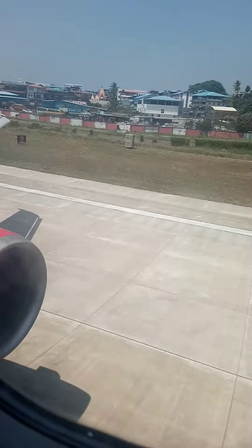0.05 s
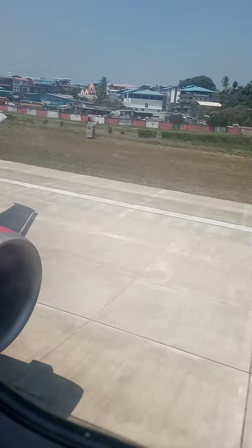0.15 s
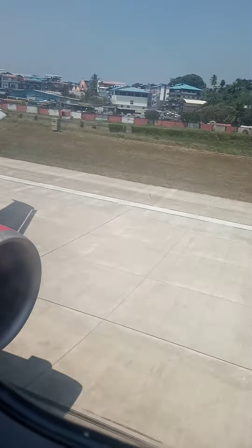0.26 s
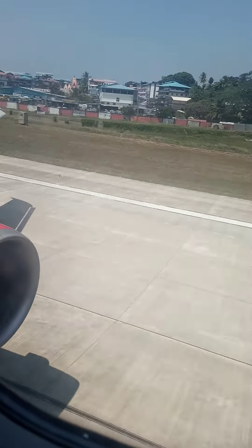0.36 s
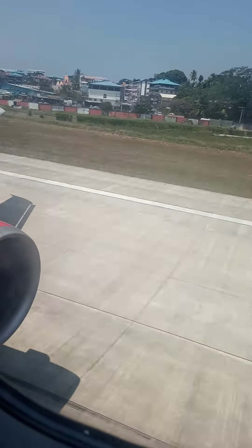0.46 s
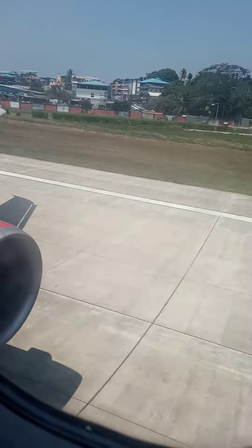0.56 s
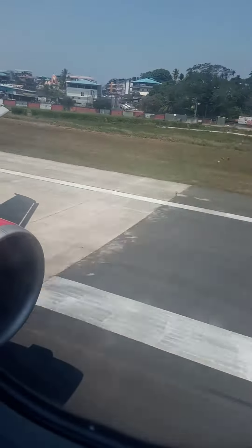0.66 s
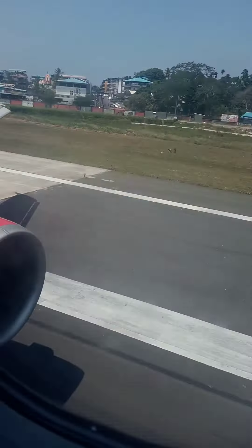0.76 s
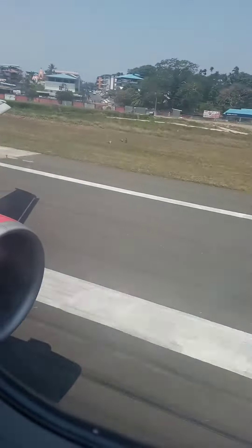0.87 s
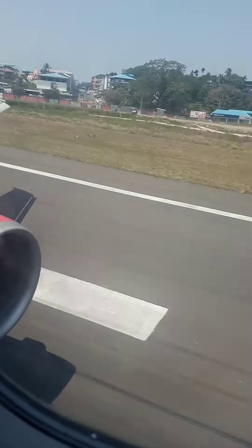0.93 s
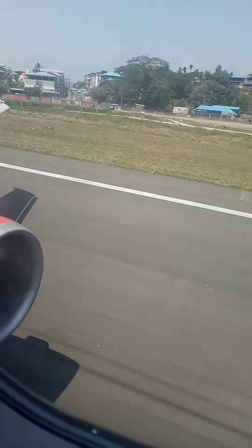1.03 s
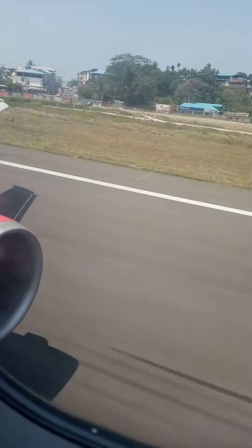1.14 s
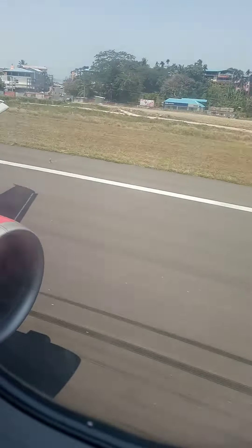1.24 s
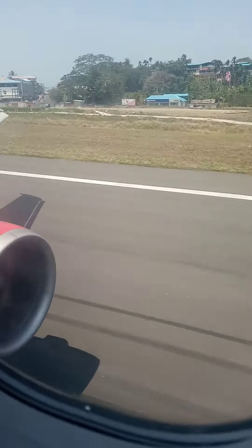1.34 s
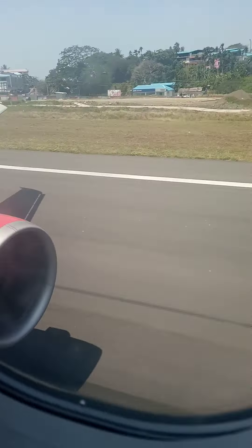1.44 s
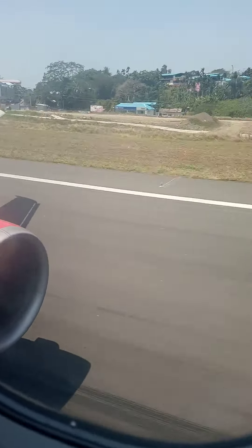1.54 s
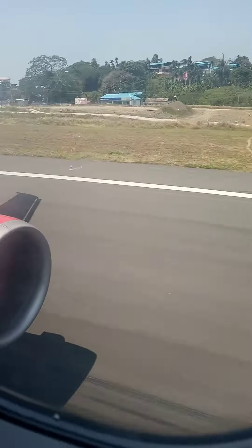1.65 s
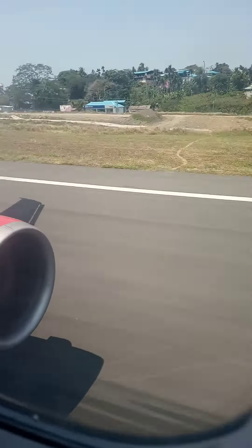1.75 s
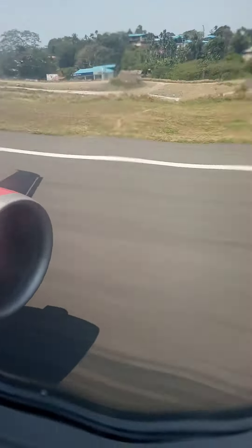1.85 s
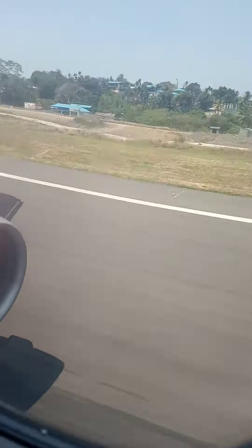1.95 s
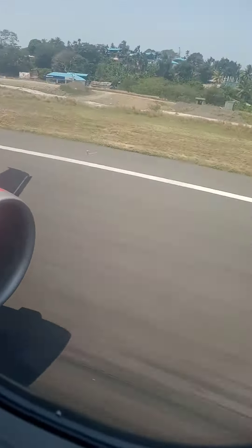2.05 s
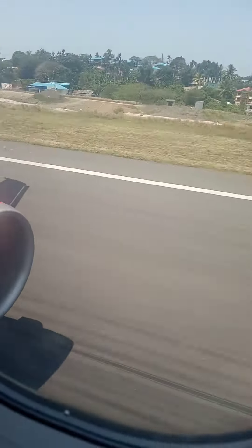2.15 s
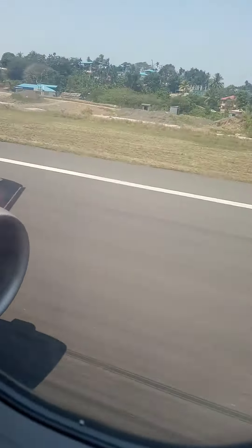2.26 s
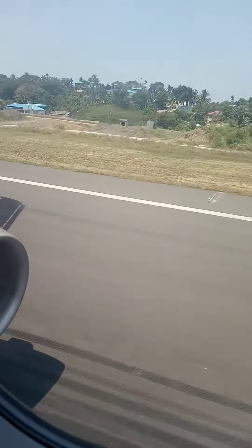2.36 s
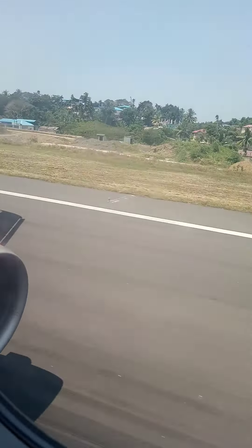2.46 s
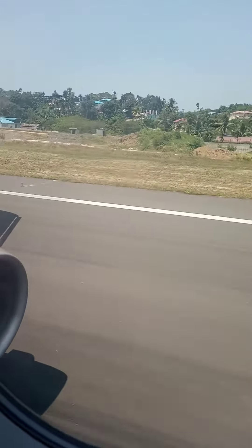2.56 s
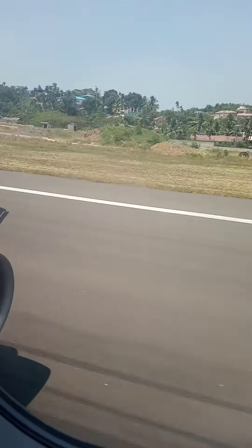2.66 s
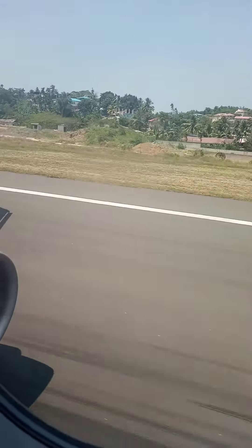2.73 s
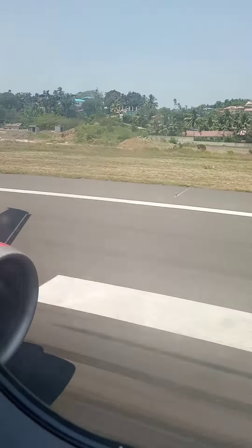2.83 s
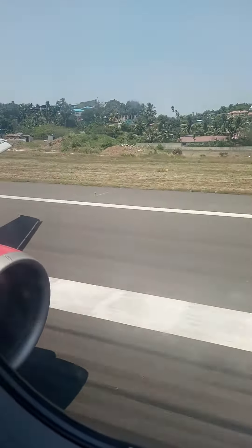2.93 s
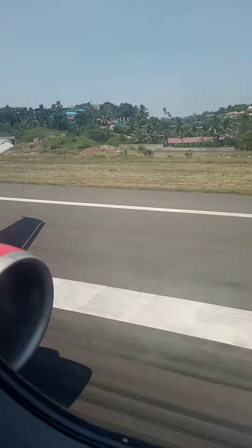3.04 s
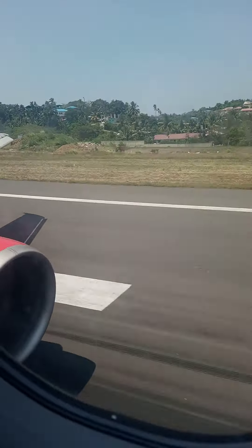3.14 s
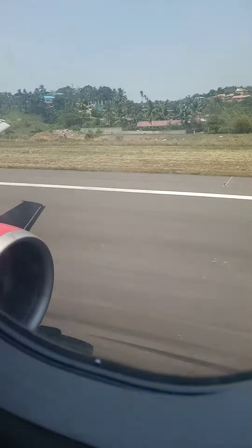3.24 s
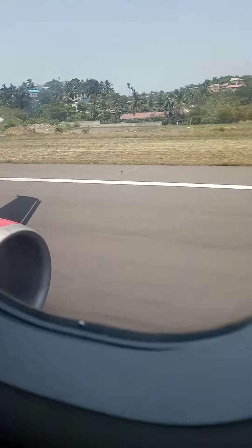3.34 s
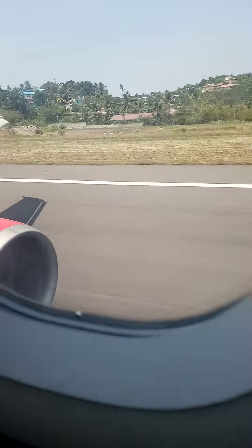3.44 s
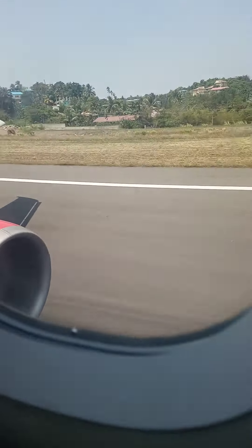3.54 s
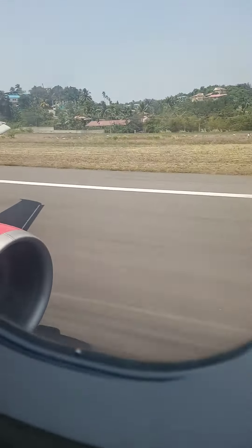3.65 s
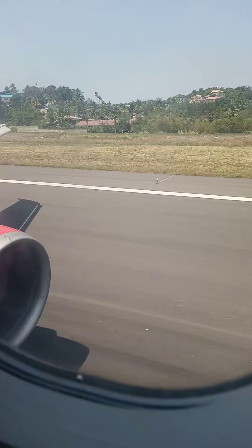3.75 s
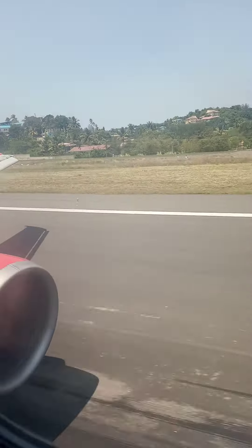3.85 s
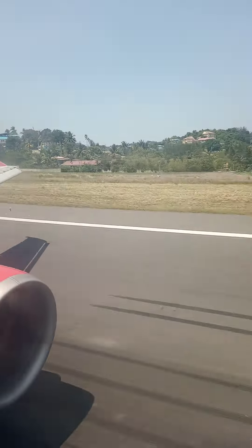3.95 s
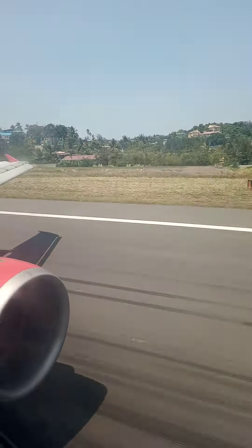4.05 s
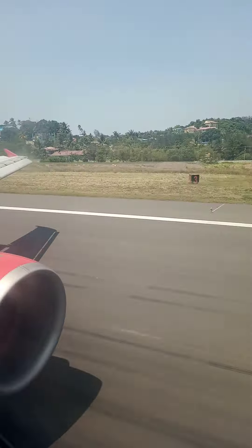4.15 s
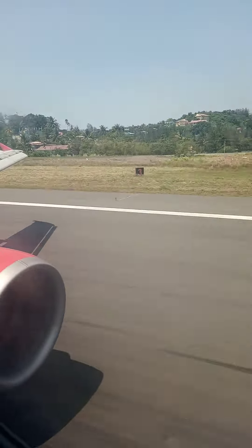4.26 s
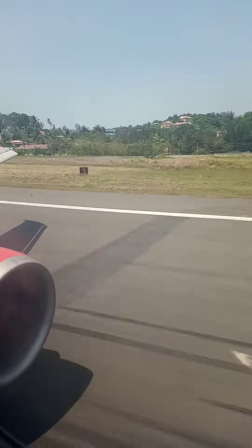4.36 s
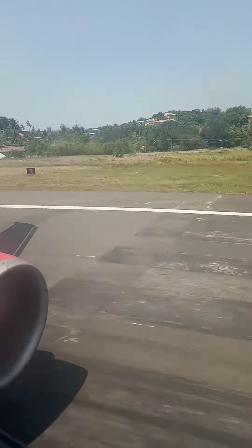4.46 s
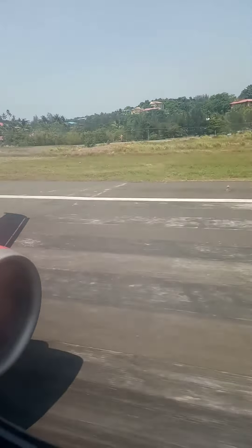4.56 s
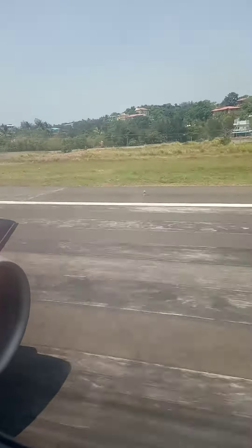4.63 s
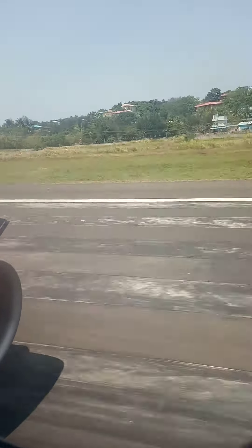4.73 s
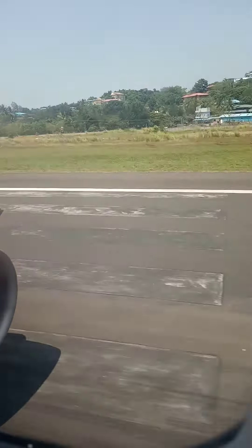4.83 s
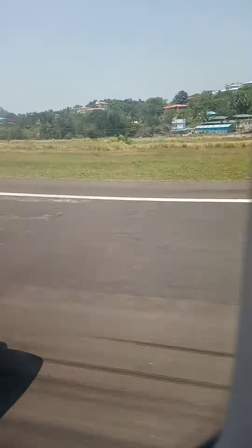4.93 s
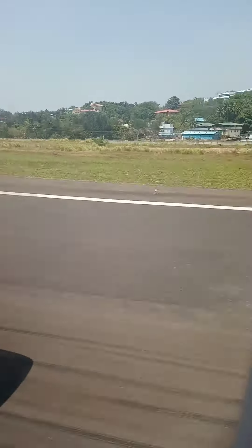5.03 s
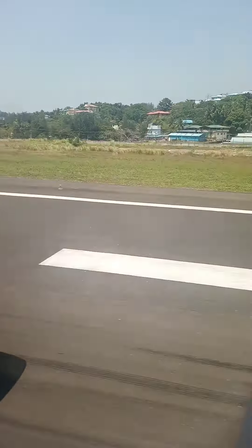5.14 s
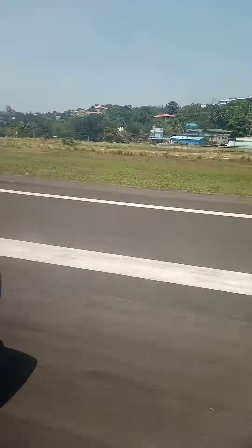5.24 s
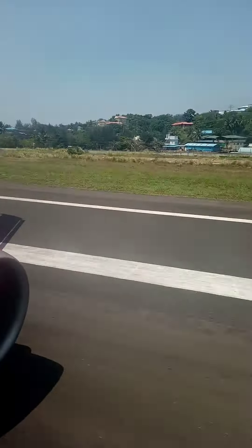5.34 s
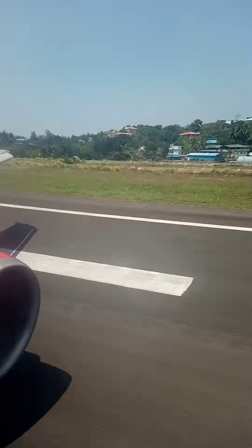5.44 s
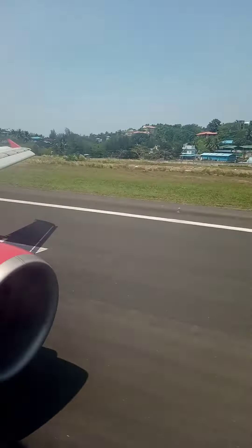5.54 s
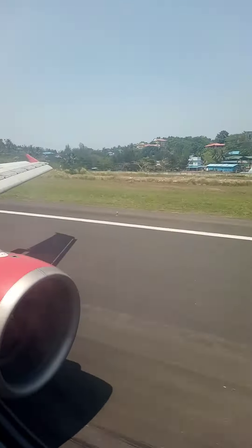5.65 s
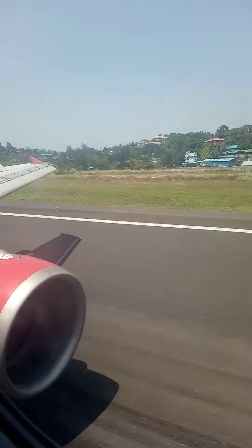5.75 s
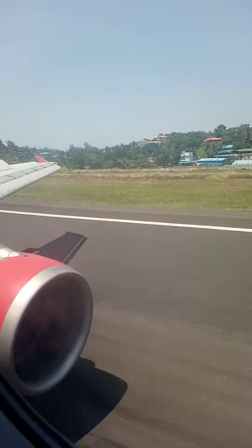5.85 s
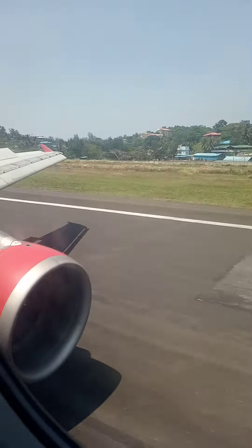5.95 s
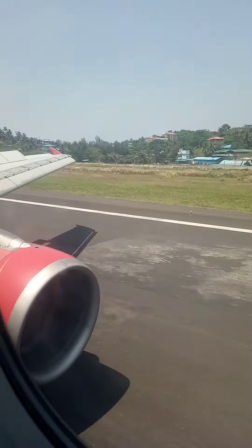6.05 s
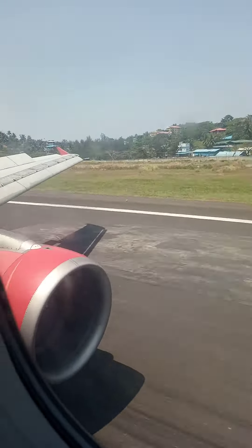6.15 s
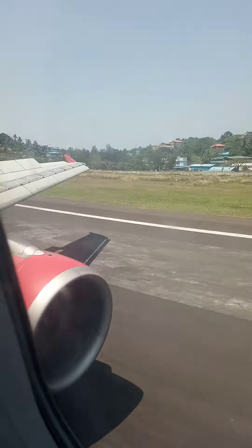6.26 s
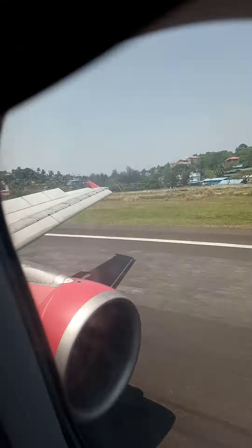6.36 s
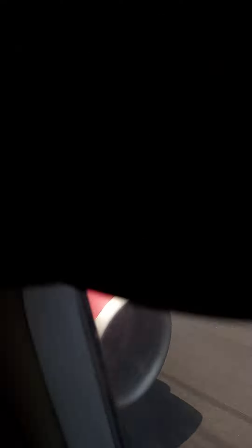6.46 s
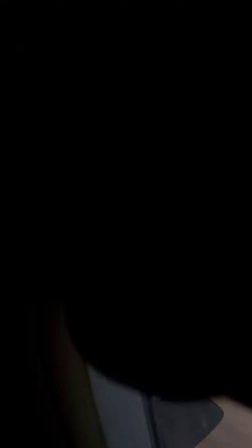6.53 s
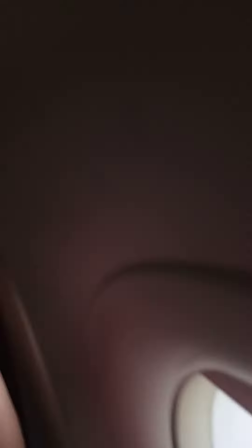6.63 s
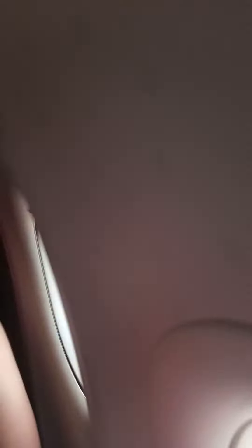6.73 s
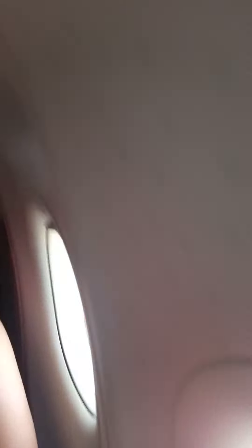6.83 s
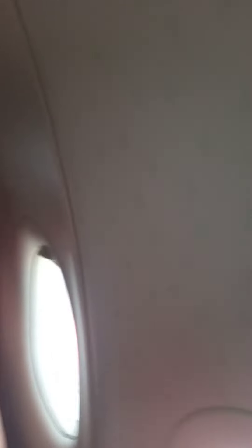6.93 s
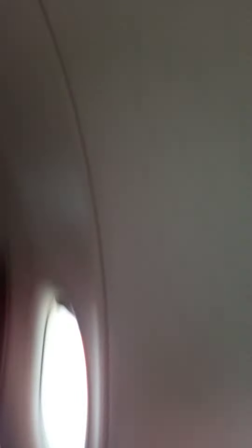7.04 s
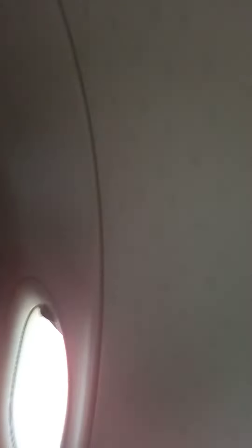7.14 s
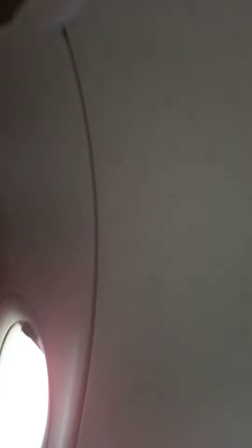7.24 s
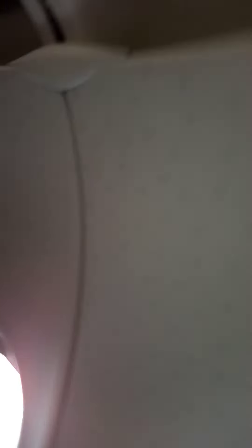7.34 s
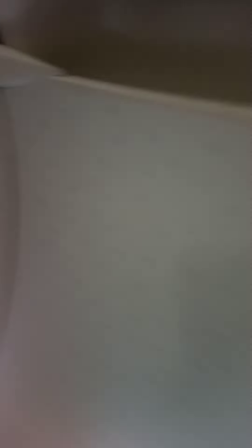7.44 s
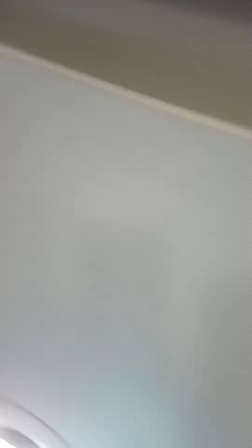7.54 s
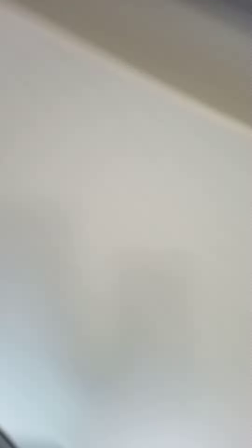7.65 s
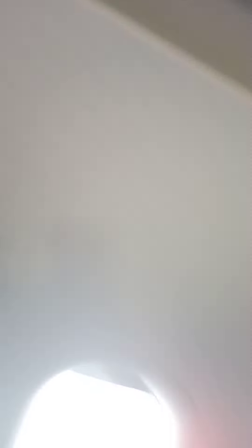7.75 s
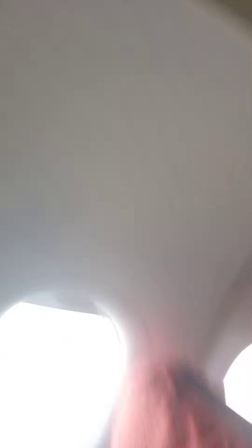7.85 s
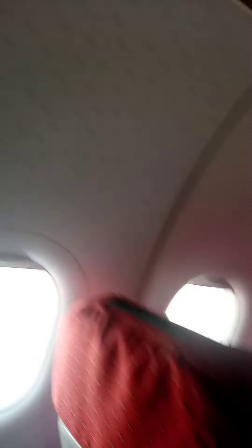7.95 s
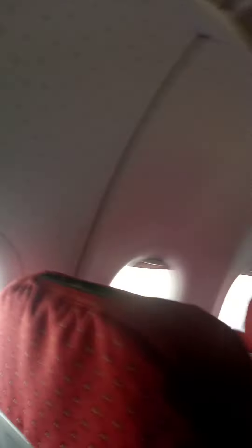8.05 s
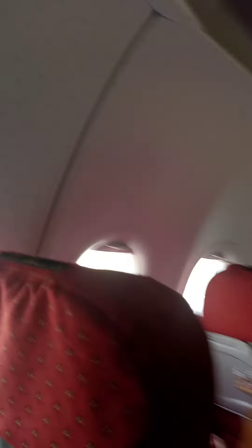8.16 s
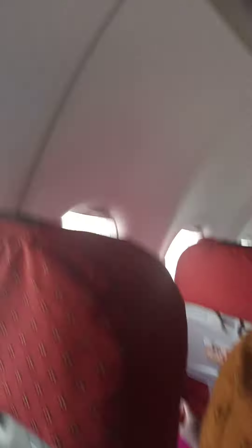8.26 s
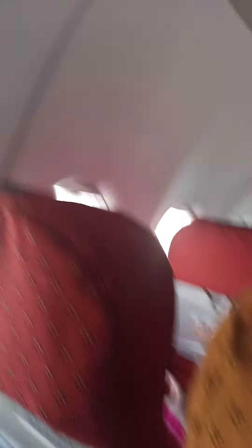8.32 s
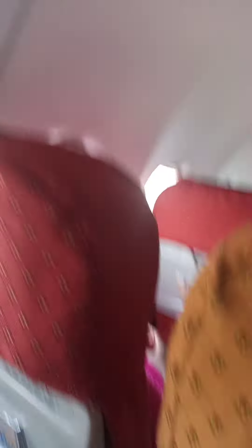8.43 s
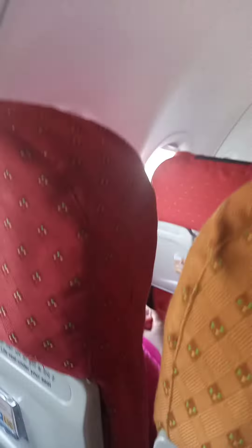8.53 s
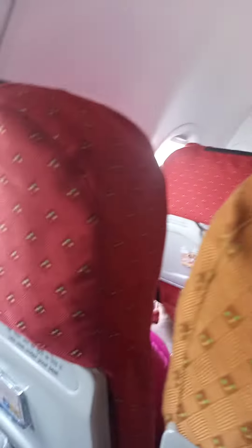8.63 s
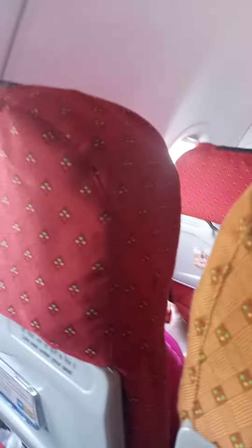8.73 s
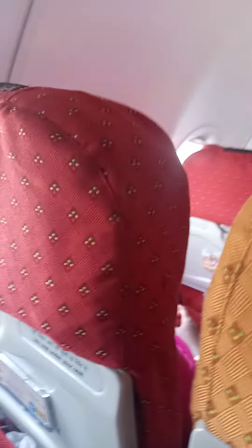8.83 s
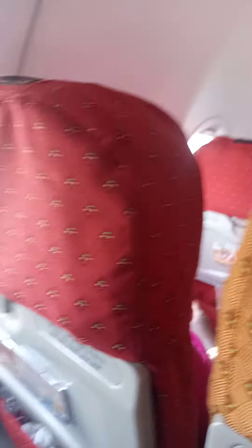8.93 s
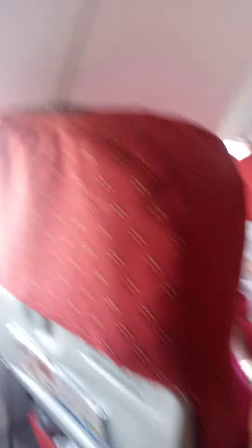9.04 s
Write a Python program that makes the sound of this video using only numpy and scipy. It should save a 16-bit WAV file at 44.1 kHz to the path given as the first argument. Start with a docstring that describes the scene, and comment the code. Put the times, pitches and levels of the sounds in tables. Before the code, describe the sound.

A jet airliner slows on the runway, heard from a phone inside the cabin. At first there is a low rumble, a steady hydraulic pump hum and a soft vent hiss that continues throughout. At about 1.3 seconds the wheel rumble grows heavier and bumps start rattling the trim, with small ticks from loose fittings and a brief plastic scrape at 1.5. The pump rises slightly and stops at 2.3; a short higher hum follows around 3. From 3.5 reverse thrust builds into a deep, resonant roar, strongest from about 6 to 8 seconds, with a faint wavering fan whine from 5.5 to 8.3. Hollow panel knocks come at 3.6, 4.3 and 6.4, then in a quick cluster just after 8. The phone case snaps sharply at 7. The roar eases slightly, with a low booming swell, as the rattling continues to the end at 9.

```python
"""Wheels rumble through the floor and a pump hums: a jet airliner braking, heard at a phone in the cabin.
The pump stops; reverse thrust swells through the hull and rings the cabin, with a faint fan tone.
Bumps rattle the trim, loose fittings tick, a panel knocks, plastic scrapes, the phone case snaps.
Air vents hiss throughout. Near the window, its recess colours the hiss and the rattle."""
import sys
import numpy as np
from scipy import signal
from scipy.fft import rfft, irfft, next_fast_len
from scipy.io import wavfile
from scipy.ndimage import uniform_filter1d, minimum_filter1d

SR = 44100
rng = np.random.default_rng(int(sys.argv[2]) if len(sys.argv) > 2 else 0)


def master(y):
    """Save y as 16-bit WAV."""
    cut = np.clip(np.atleast_2d(y).T, -1, 1)
    pcm = np.round(cut * 32767)  # scale
    wavfile.write(sys.argv[1], SR, pcm.astype(np.int16))


N = 400869

# wheel rumble through the floor: t/s, level/dB
WHEEL_LEVEL = [(0, -29), (.7, -29.5), (1.05, -33), (1.3, -21), (1.9, -19), (2.4, -21), (2.6, -27.5),
               (2.9, -22), (3.1, -20.5), (3.6, -18.5), (4.1, -24), (4.3, -18), (4.9, -18), (5.45, -18),
               (6.05, -17.5), (6.2, -21.5), (6.9, -18.5), (7.8, -22.5), (9.09, -22.5)]


def thrust():
    """The deflected jet beats on the hull; power lifts each band; wheels and jolts shake it too."""
    # band spectra: f/Hz, relative level/dB
    boom_spectrum = [(70, -18), (95, -11.5), (125, -5.5), (145, -9.5), (170, -15), (210, -32.5)]
    growl_spectrum = [(120, -19), (150, -3.5), (190, -2), (225, 0), (260, -27), (320, -42)]
    body_spectrum = [(190, -25), (240, -2.5), (300, -4.5), (400, -8.5), (520, -13), (600, -33.5),
                     (750, -32)]
    rush_spectrum = [(480, -16.5), (600, 1), (750, -2), (1000, -10), (1400, -15.5), (2200, -19),
                     (3000, -27), (6500, -30), (8000, -42), (11500, -50.5), (13000, -71.5)]
    engine_power = [(0, 0), (1.4, 0), (2.8, 0.02), (3.3, 0.11), (4.2, 0.41), (5.0, 0.45), (5.8, 0.74),
                    (6.3, 0.97), (6.9, 1), (7.6, 1), (8.2, 0.97), (9.09, 0.77)]  # t/s, power/0-1
    phone_turn = [(0, 0.17), (6.3, 0.14), (7.1, 0.61), (7.6, 0.69), (8.3, 0.43), (9.09, 1)]  # swing from window into cabin: t/s, turn/0-1
    power, turn = curves(engine_power)[0], curves(phone_turn)[0]
    # dB: idle + rise with power + change with turn
    boom = undb(-29 + 14.5 * power)
    growl = undb(-30 + 12.5 * power + 3.5 * turn)
    body = undb(-29.5 + 13 * power - 3 * turn)
    rush = undb(-45.5 + 13 * power + 3 * turn)
    boom = np.hypot(boom, undb(curves(WHEEL_LEVEL)[0] - 6))
    rush = np.hypot(rush, undb(1.5) * np.sqrt(jolts()[0]))
    return (boom * cabin_noise(boom_spectrum, flicker_db=.83, rate_hz=11)
            + growl * cabin_noise(growl_spectrum, flicker_db=.98, rate_hz=9)
            + body * cabin_noise(body_spectrum, flicker_db=.3, rate_hz=17)
            + rush * cabin_noise(rush_spectrum, flicker_db=.44, rate_hz=15))


def wheels():
    """Tyres on rough tarmac thud through gear and floor."""
    spectrum = [(20, -48), (32, -15.5), (45, 1), (60, 3.5), (80, 3.5), (100, 0), (140, -45.5)]  # f/Hz, relative level/dB
    return undb(curves(WHEEL_LEVEL)[0]) * cabin_noise(spectrum, flicker_db=1.1, rate_hz=12)


def swells():
    """Bands of noise rise out of the roar and sink back."""
    events = [(1.949, 0.32, 1500, 1700, -51), (3.4, 0.29, 1700, 1600, -44), (4.101, 1.1, 271, 6.6, -31),
              (4.801, 1.0, 270.6, 8.5, -27), (5.502, .9, 267.5, 6.4, -26), (6.3, 1.1, 266.8, 9.1, -25.5),
              (6.146, 0.42, 286, 88, -20), (6.751, 0.45, 610, 88, -33), (6.821, 0.5, 340, 91, -18),
              (7.3, 0.58, 524, 50, -29.5), (7.797, 0.13, 1790, 1200, -41), (7.905, 0.13, 740, 76, -35),
              (8.058, .07, 1900, 900, -43), (8.163, .04, 1750, 540, -38.5), (8.6, 1.3, 182.7, 35, -17.5)]  # t/s, length/s, f/Hz, width/Hz, level/dB
    t = np.arange(N) / SR
    out = np.zeros(N)
    for peak_s, length_s, hz, width_hz, db in events:
        near = np.abs(t - peak_s) < 1.5 * length_s
        band = unit(ring_modes(rng.standard_normal(SR * 4), [(hz, width_hz, 0)]))
        envelope = np.exp(-8 * ((t[near] - peak_s) / length_s) ** 2)
        out[near] += undb(db) * envelope * band[-near.sum():]
    return out


def pump():
    """The hydraulic pump sings two harmonics until it cuts out."""
    track = [(0, 353, -32.5, -47.5), (.9, 353, -32.5, -49), (1.55, 355, -32.5, -52), (1.7, 351, -34, -57),
             (1.85, 356, -34.5, -59), (2.1, 364, -33.5, -62), (2.18, 365, -34.5, -64),
             (2.27, 371, -36, -66), (2.36, 374, -60, -80)]  # t/s, f/Hz, level/dB, second harmonic/dB
    hz, db, second_db = curves(track)
    phase = wavering_phase(hz)
    first = undb(db + .6 * walk(8)) * np.sin(phase)
    second = undb(second_db + 1.4 * walk(8)) * np.sin(2 * phase)
    return np.sqrt(2) * (first + second)


def hum():
    """A brief higher hum swells and sags in pitch."""
    track = [(2.6, 481, -65), (2.8, 481.4, -47), (3.0, 482, -39), (3.25, 467, -61), (3.45, 460, -67)]  # t/s, f/Hz, level/dB
    hz, db = curves(track)
    return np.sqrt(2) * undb(db + 1.5 * walk(12)) * np.sin(wavering_phase(hz))


def fan(steady=.4, blur_hz=130):
    """Blade tone of the engine fan; turbulence spreads most of it into a band."""
    track = [(5.4, 2040, -76), (5.7, 2170, -60), (6.0, 2220, -56), (6.12, 2215, -52), (6.3, 2180, -61),
             (6.55, 2070, -53), (6.75, 2040, -58), (6.9, 2060, -60), (7.2, 2115, -59), (7.55, 2145, -57),
             (7.9, 2120, -57), (8.15, 2085, -57), (8.35, 2060, -76)]  # t/s, f/Hz, level/dB
    hz, db = curves(track)
    return np.sqrt(2) * undb(db) * (steady + walk(blur_hz)) * np.sin(wavering_phase(hz))


def knocks():
    """Hollow knocks on a panel."""
    blows = [(3.6244, -16.5, .002, 0, -3), (3.6285, -21, .002, -2, -2), (4.345, -19.5, .0015, -.5, 2),
             (4.3515, -23, .002, -4, 5), (6.3835, -25, .0015, 0, 2), (6.394, -26, .003, -3, 5),
             (8.044, -21, .004, -4, 3), (8.068, -22, .004, -4, 4), (8.135, -23, .005, -4, 4),
             (8.1575, -18, .005, -4, 4), (8.165, -17, .005, -6, 8), (8.173, -17, .005, -6, 9),
             (8.793, -26, .004, -1, 0)]  # t/s, peak/dB, contact/s, hardness/(dB/octave), hollow lift/dB
    panel_modes = [(520, -5, .03), (646, -1, .032), (840, -5, .028), (1050, -10, .024), (1345, -9, .022),
                   (1700, -8, .02), (1970, -8, .02), (2340, -5.5, .015), (2620, -12, .014),
                   (3030, -12, .014), (3830, -11, .016), (4300, -13, .014), (4800, -14, .014),
                   (5700, -16, .012), (6400, -16, .012), (7200, -16, .012), (8600, -16, .01),
                   (10500, -19, .008), (12500, -24, .008), (14800, -22, .008)]  # f/Hz, level/dB, t60/s
    return strike(blows, panel_modes)


def snaps(contact_s=.00005):
    """Dry snaps against the phone case."""
    blows = [(7.0171, -10, 1.5), (7.0292, -17, 1), (7.0296, -6, .5)]  # t/s, peak/dB, hardness/(dB/octave)
    case_modes = [(1100, -1, 0.0028), (1900, 4, 0.0022), (3000, 2, 0.0015), (4200, -1, 0.0016),
                  (5200, 0, .002), (6300, 3, 0.0023), (9000, -12, 0.002), (11500, -13, .002),
                  (13500, -20, .003), (15000, -16, .003)]  # f/Hz, level/dB, t60/s
    return strike([(s, db, contact_s, hardness, 0) for s, db, hardness in blows], case_modes)


def ticks():
    """Dying noise bursts ring the modes of loose fittings."""
    events = [(1.22, -41, 6700, -15, -14, .02), (1.2448, -33, 6100, -1, -15, 0.04),
              (1.2465, -33, 5100, -5, -20, 0.04), (1.286, -30, 5910, -15, -12, 0.056),
              (1.3259, -37, 5620, -14, -21, 0.035), (1.538, -35, 5760, -9, -18, 0.035),
              (1.883, -37, 6440, -10, -17, 0.027), (2.108, -48, 7000, -8, 0, .02),
              (2.702, -48, 6170, -6, 4, 0.035), (3.1073, -33.5, 4900, -2, -21, 0.035),
              (3.318, -36, 5910, -7, -9, 0.031), (3.388, -40, 4600, -6, -16, .03),
              (3.41, -35, 6300, -4, -14, .03), (3.44, -40, 5200, -4, -16, .03),
              (3.3468, -32, 6100, -13, -20, 0.027), (3.7095, -40.5, 5880, 4, 5, 0.028),
              (3.752, -47, 6130, -8, -15, 0.032), (3.792, -35, 5700, -12, -16, 0.05),
              (3.846, -39, 4990, -7, -4, 0.025), (4.2826, -34, 5920, -3, -22, 0.05),
              (4.2882, -33, 6100, -6, -22, 0.04), (4.289, -30, 4050, -8, -22, 0.05),
              (4.3924, -42, 4600, -7, -22, 0.032), (4.7252, -40, 4980, -9, -23, 0.035),
              (4.902, -34, 5550, -11, -22, 0.035), (5.1454, -44, 5910, -9, -15, 0.035),
              (5.1936, -36, 6560, -14, -19, 0.035), (5.378, -38, 5900, -11, -6, 0.03),
              (5.449, -35.5, 6040, -13, -10, 0.03), (5.625, -47, 6000, -9, -1, 0.03),
              (5.65, -43, 5220, -8, -25, 0.035), (5.7947, -35, 4660, -10, -17, 0.035),
              (6.378, -31, 5930, -3, -29, 0.035), (6.473, -34, 4960, -17, -20, 0.032),
              (7.0195, -36, 6700, -20, -22, 0.03)]  # t/s, mid peak/dB, mid f/Hz, low/dB re mid, high/dB re mid, t60/s
    fitting_modes = [
        [(2000, 900, -14), (3070, 750, 20)],
        [(10600, 5500, -1), (14900, 2000, -14)],
    ]  # low group, high group: f/Hz, width/Hz, level/dB
    t = np.arange(SR // 12) / SR
    out = np.zeros(N + len(t))
    for start_s, peak_db, hz, low_db, high_db, t60_s in events:
        burst = rng.standard_normal(len(t)) * np.exp(-np.log(1000) * t / t60_s)
        mid_modes = [(hz, 900, 0), (5800, 4000, -5)]
        for group, db in zip(fitting_modes + [mid_modes], (low_db, high_db, 0)):
            ring = ring_modes(burst, group)
            out[int(start_s * SR):][:len(t)] += undb(peak_db + db) * ring / np.abs(ring).max()
    return out[:N]


def rattle(gain, sizzle_gain):
    """Many tiny knocks in the shaken trim."""
    spectrum = [(880, -1), (1500, -7.5), (1630, -6.5), (2470, -4.5), (2850, -12), (3040, -10), (4020, -9),
                (6370, -8.5), (7630, -14.5), (10200, -20.5), (13000, -34.5)]  # f/Hz, relative level/dB
    # thin high sizzle, lifted near 15 kHz by the phone's microphone: f/Hz, relative level/dB
    sizzle_spectrum = [(13000, -37.5), (13900, -21), (14400, -5), (15000, 0), (16000, -3.5)]
    shake = bursts(per_s=700, spread_db=2, decay_s=.011, samples=SR // 40)
    return gain * through_recess(shake, spectrum) + sizzle_gain * colour(shake, sizzle_spectrum)


def crackle(gain):
    """Sparse fine ticks of the trim, riding on the rattle."""
    spectrum = [(5500, -25.5), (7500, -8.5), (10000, -2), (13000, -8.5), (15500, -5)]  # f/Hz, relative level/dB
    pops = bursts(per_s=45, spread_db=2.2, decay_s=.002, samples=SR // 100)
    return gain * undb(-27) * colour(pops, spectrum)


def shaking():
    """Gains of the rattle and its high sizzle: fluttering bed plus jolts."""
    bed_level = [(0, -53, -76), (1.15, -56.5, -77), (1.3, -57, -72), (2.4, -51, -67), (2.9, -55.5, -74),
                 (3.5, -59, -74), (4.5, -52, -73), (6.0, -52, -75), (6.6, -48, -75), (7.0, -49, -73),
                 (7.6, -51, -80), (8.0, -59, -76), (9.09, -58, -73)]  # t/s, level/dB, sizzle/dB
    db, sizzle_db = curves(bed_level)
    flutter = walk(60)
    bed = undb([db - 1.5 * flutter, sizzle_db + 3 * flutter])
    return np.sqrt(bed ** 2 + jolts())


def jolts(fall_ratio=1.34):
    """Power of the rattle and its high sizzle: each bump swells fast and falls more slowly."""
    bumps = [(1.247, 0.085, -48, -62), (1.414, 0.045, -50, -64), (1.55, 0.15, -46, -60),
             (1.72, 0.24, -50.5, -62), (1.932, 0.24, -44.5, -64), (2.337, 0.14, -55, -63),
             (2.96, 0.058, -49.5, -59), (3.2, 0.21, -49.5, -58), (3.385, 0.26, -43, -62),
             (3.8, 0.29, -48.5, -61), (4.128, 0.13, -49.5, -68), (4.305, 0.078, -45.5, -63),
             (4.75, 0.55, -50, -67), (5.02, 0.044, -49, -54), (5.19, .07, -45.5, -57),
             (5.387, .1, -63, -69), (5.724, .05, -59, -67), (5.954, .06, -44, -68), (6.214, 0.22, -51, -64),
             (6.472, .06, -51, -59), (6.7, 0.16, -47, -67), (6.96, 0.14, -62, -67), (7.076, .09, -50, -57),
             (7.216, 0.035, -57, -67), (7.295, 0.033, -48, -65), (7.404, 0.2, -47.5, -74),
             (7.69, .12, -45, -68), (7.822, 0.063, -42, -68), (8.04, 0.076, -46, -72),
             (8.294, 0.39, -47, -75), (8.6, 0.42, -46, -71), (8.804, 0.11, -45.5, -70)]  # t/s, length/s, level/dB, sizzle/dB
    t = np.arange(N) / SR
    out = np.zeros((2, N))
    for peak_s, length_s, db, sizzle_db in bumps:
        near = slice(int((peak_s - .6) * SR), int((peak_s + .8) * SR))
        age = (t[near] - peak_s) / (length_s / 2)
        envelope = np.exp(-np.where(age < 0, 2 * age ** 2, 1.8 * age / fall_ratio))
        out[:, near] += undb([[db], [sizzle_db]]) ** 2 * envelope
    return out


def scrape():
    """Grainy friction rings three modes of the plastic."""
    level = [(1.47, -75), (1.51, -52), (1.55, -48), (1.6, -51), (1.64, -57), (1.68, -71)]  # t/s, level/dB
    plastic_modes = [(4500, 170, 15), (5470, 200, 9.1), (6050, 300, 8)]  # f/Hz, width/Hz, lift/dB
    spectrum = [(3500, -20.5), (4300, -.5), (6800, 3), (8000, -21)]  # f/Hz, relative level/dB
    grains = rng.standard_normal(N) * undb(2.3 * walk(150))
    return undb(curves(level)[0]) * colour(grains, spectrum, plastic_modes)


def vents(level_db=-53):
    """Smooth hiss of the air supply."""
    spectrum = [(530, -36.5), (900, -16), (1270, -8), (2710, -2), (4490, -8.5), (5240, -17), (7250, -8.5),
                (8370, -21), (10500, -23), (12600, -32), (13900, -34.5), (14700, -26), (15800, -30.5)]  # f/Hz, relative level/dB
    return undb(level_db) * through_recess(rng.standard_normal(N), spectrum)


def cabin_noise(spectrum, flicker_db, rate_hz):
    """Flickering turbulent noise rings the cabin; rms 1."""
    cabin_modes = [(114.8, 49, 7.5), (186.2, 30, 5.5), (268.2, 15, 7), (546, 36, 5)]  # f/Hz, width/Hz, lift/dB
    noise = rng.standard_normal(N) * undb(flicker_db * walk(rate_hz))
    return colour(noise, spectrum, cabin_modes)


def through_recess(x, spectrum):
    """Colour x; near the window the recess adds its resonances."""
    recess_modes = [(1760, 100, 7), (2120, 100, 2.5), (2750, 380, 6), (3450, 100, 8), (4300, 200, 4.5),
                    (4980, 190, 5), (5300, 150, -3), (5470, 86, 7.5), (5850, 150, 7), (6580, 450, 7.5),
                    (9150, 100, 3), (9470, 170, -1), (10100, 150, -6)]  # f/Hz, width/Hz, lift/dB
    recess_share = [(0, 0.6), (2.3, 0.8), (3.2, 0.03), (6.3, 0.3), (6.8, 0.3), (9.09, 0.05)]  # t/s, share/0-1
    share = curves(recess_share)[0]
    return share * colour(x, spectrum, recess_modes) + (1 - share) * colour(x, spectrum)


def strike(blows, modes, hollow_hz=900):
    """Blows ring decaying modes; long contact slows the attack, hardness favours the high modes."""
    t = np.arange(SR // 10) / SR
    hz, db, t60_s = np.transpose(modes)[:, :, None]
    decay = np.exp(-np.log(1000) * t / t60_s)
    hollow = np.exp(-(np.log2(hz / hollow_hz) / .4) ** 2)  # modes lifted by a mid-panel blow
    scatter = rng.standard_normal((len(blows), 2, len(modes), 1))
    out = np.zeros(N + len(t))
    for (start_s, peak_db, contact_s, hardness, hollow_db), (detune, uneven) in zip(blows, scatter):
        lift_db = hardness * np.log2(hz / 1000) + hollow_db * hollow + 1.5 * uneven
        ring = undb(db + lift_db) * np.sin(2 * np.pi * hz * (1 + .015 * detune) * t) * decay
        hit = ring.sum(axis=0) * (1 - np.exp(-t / contact_s))
        out[int(start_s * SR):][:len(t)] += undb(peak_db) * hit / np.abs(hit).max()
    return out[:N]


def bursts(per_s, spread_db, decay_s, samples):
    """Randomly timed, dying noise bursts of unequal size."""
    impulses = (rng.random(N) < per_s / SR) * undb(spread_db * rng.exponential(size=N))
    tail = np.exp(-np.arange(samples) / (decay_s * SR))
    return signal.fftconvolve(impulses, tail)[:N] * rng.standard_normal(N)


def ring_modes(x, modes):
    """Sum of resonators (f/Hz, width/Hz, level/dB), each applied twice."""
    out = 0
    for hz, width_hz, db in modes:
        b, a = signal.iirpeak(hz, hz / width_hz, SR)
        out = out + undb(db) * signal.lfilter(b, a, signal.lfilter(b, a, x))
    return out


def colour(x, spectrum, modes=()):
    """Shape x by a spectrum (f/Hz, level/dB) and resonances; rms 1."""
    size = next_fast_len(N)
    hz = np.arange(size // 2 + 1) * SR / size + 1e-3
    point_hz, db = np.transpose(spectrum)
    gain = undb(np.interp(np.log(hz), np.log(point_hz), db, left=-120, right=-120))
    for centre_hz, width_hz, lift_db in modes:
        gain *= undb(lift_db / (1 + (2 * (hz - centre_hz) / width_hz) ** 2))
    return unit(irfft(rfft(x, size) * gain, size)[:N])


def wavering_phase(hz):
    """Phase of a tone whose pitch wavers slightly."""
    return 2 * np.pi * np.cumsum(hz * (1 + .0015 * walk(6))) / SR


def walk(rate_hz):
    """Random steps, smoothed twice; rms 1."""
    hold = int(SR / rate_hz)
    steps = np.repeat(rng.standard_normal(N // hold + 1), hold)
    return unit(uniform_filter1d(uniform_filter1d(steps, hold), hold)[:N])


def curves(table):
    """Columns of a table, interpolated linearly in time."""
    times_s, *columns = np.transpose(table)
    return [np.interp(np.arange(N) / SR, times_s, column) for column in columns]


def undb(db):
    """Decibels to gain."""
    return 10 ** (np.asarray(db) / 20)


def unit(x):
    """Scale to rms 1."""
    return x / np.sqrt(np.mean(x ** 2))


def scene():
    """All sources, mono."""
    hits = ticks() + knocks() + snaps()
    gain, sizzle_gain = shaking()
    roar = wheels() + thrust() + swells()
    tones = pump() + hum() + fan()
    treble = vents() + rattle(gain, sizzle_gain) + crackle(gain) + scrape()
    return (roar + tones + hits + treble)[None]


def record(dry, threshold=.3, look_s=.02, cutoff_hz=15720):
    """A soft look-ahead limiter holds down the loudest swings; the top is cut."""
    window = int(look_s * SR)
    gain = np.minimum(1, (threshold / (np.abs(dry) + 1e-9)) ** .53)
    gain = uniform_filter1d(minimum_filter1d(gain, window), window)
    lowpass = signal.ellip(10, .1, 45, cutoff_hz, fs=SR, output="sos")
    return signal.sosfiltfilt(lowpass, 1.05 * dry * gain, padlen=SR // 10)


dry = scene()
out = record(dry)
master(out)
```